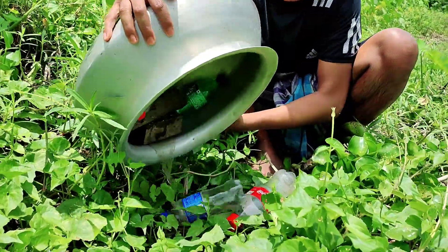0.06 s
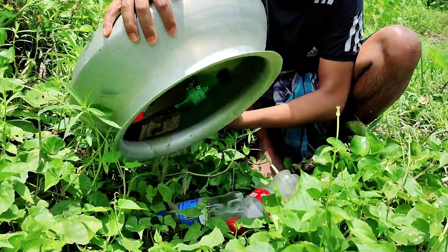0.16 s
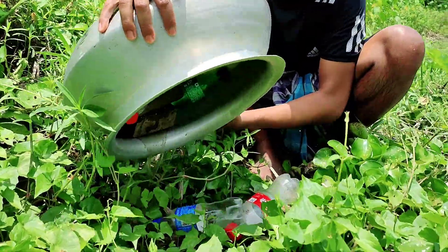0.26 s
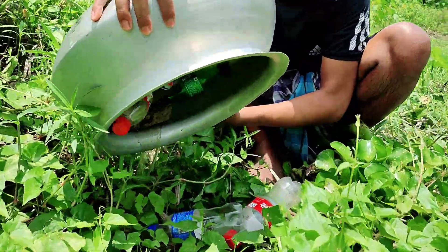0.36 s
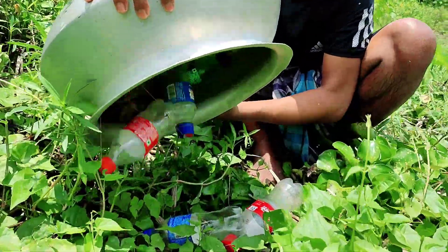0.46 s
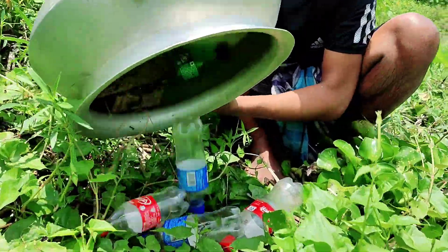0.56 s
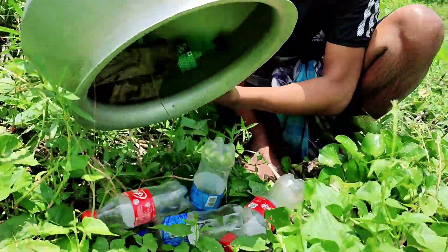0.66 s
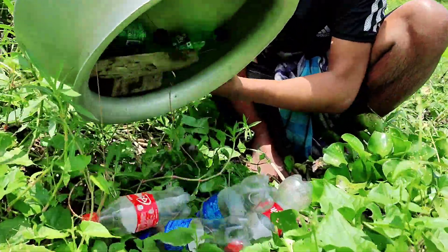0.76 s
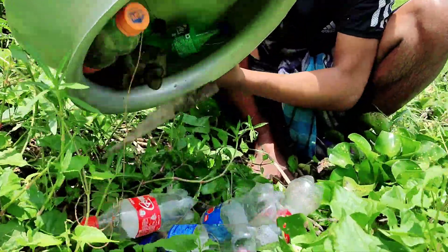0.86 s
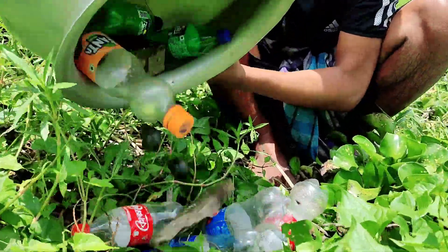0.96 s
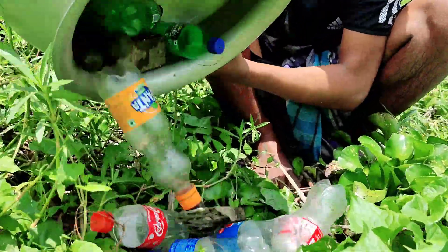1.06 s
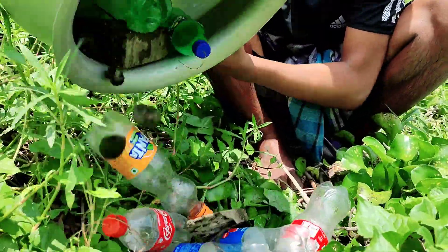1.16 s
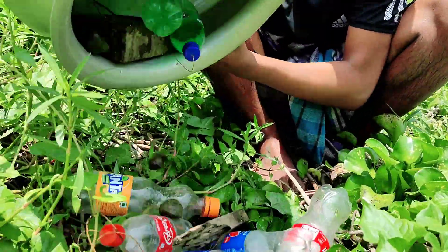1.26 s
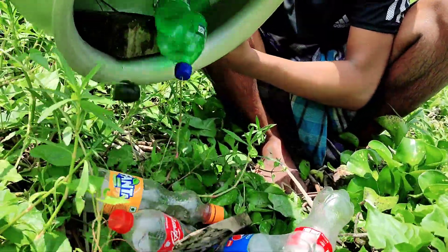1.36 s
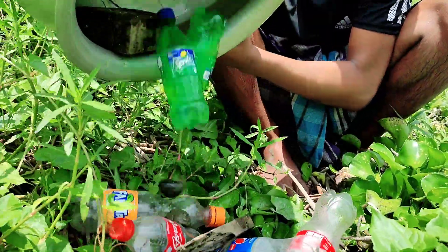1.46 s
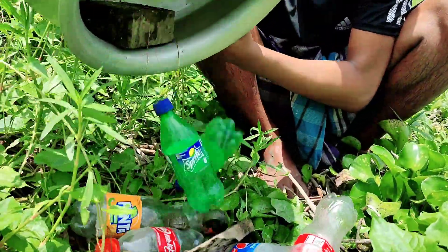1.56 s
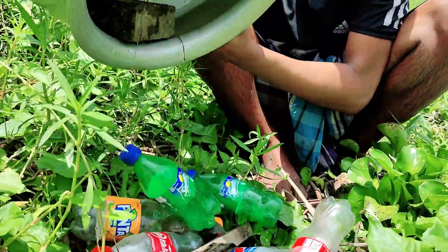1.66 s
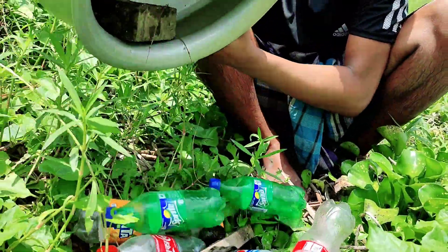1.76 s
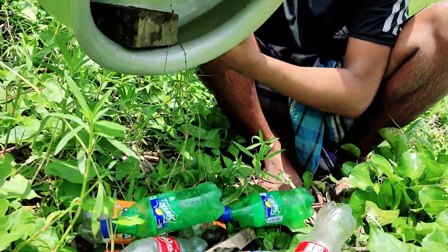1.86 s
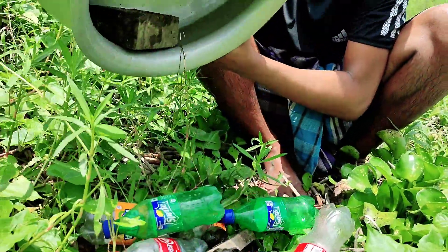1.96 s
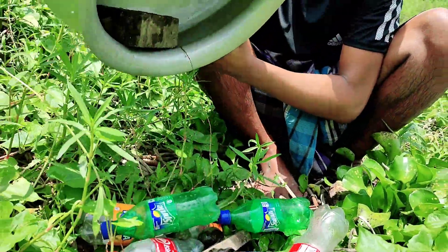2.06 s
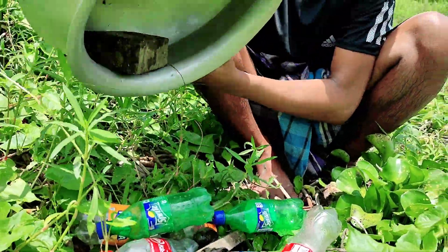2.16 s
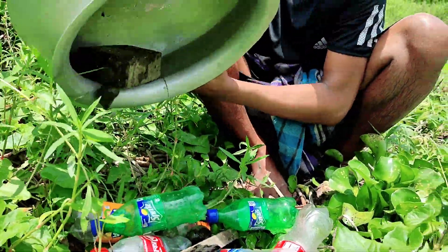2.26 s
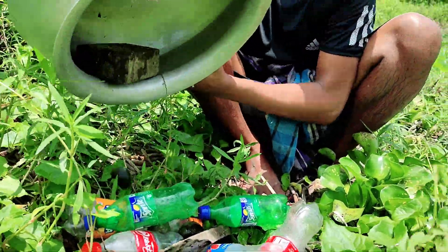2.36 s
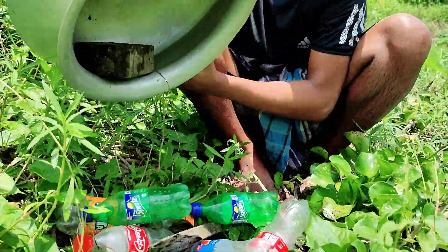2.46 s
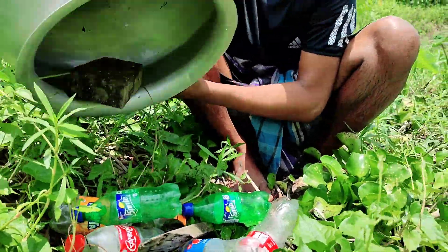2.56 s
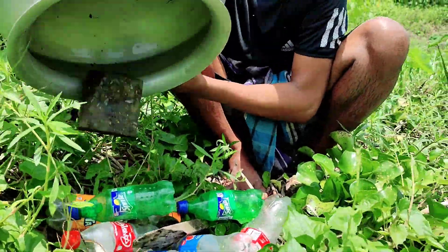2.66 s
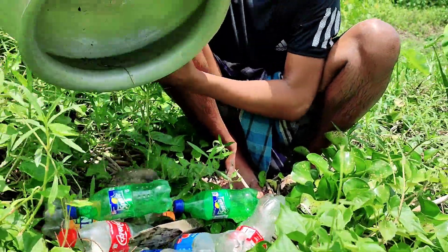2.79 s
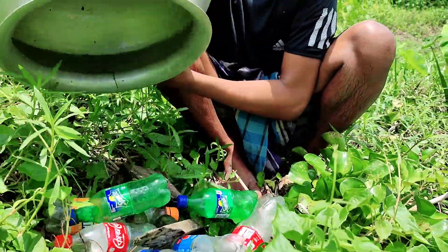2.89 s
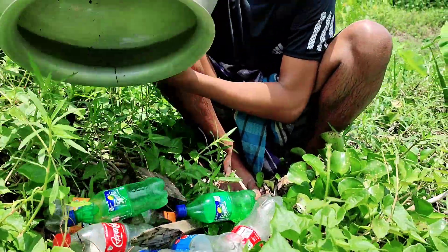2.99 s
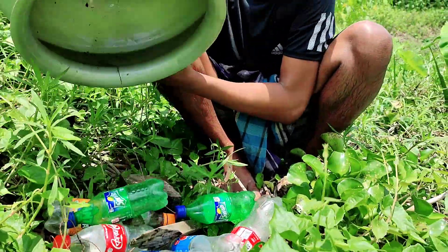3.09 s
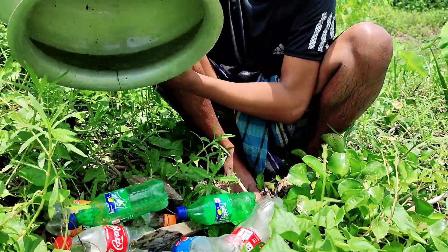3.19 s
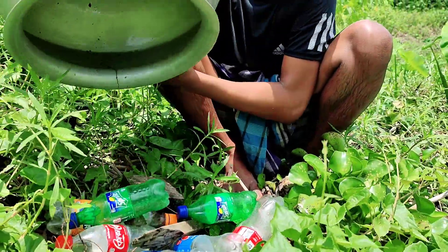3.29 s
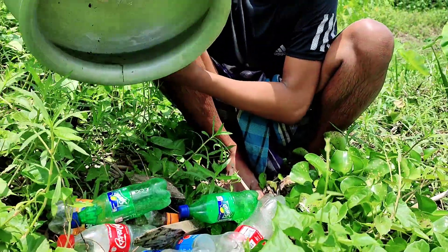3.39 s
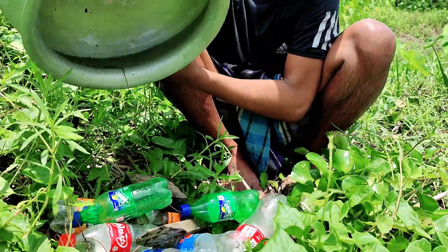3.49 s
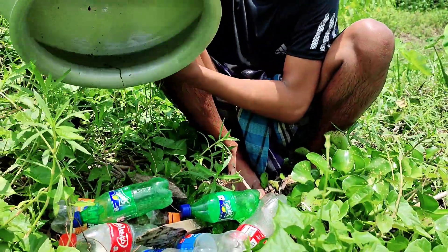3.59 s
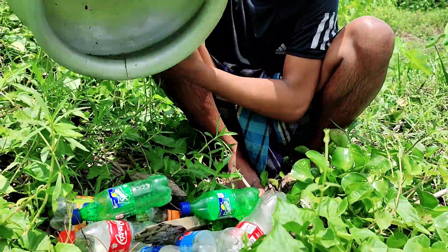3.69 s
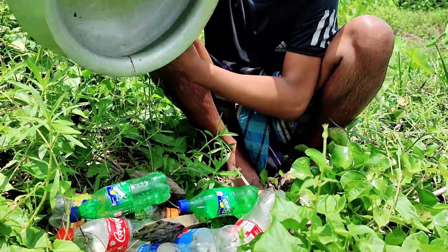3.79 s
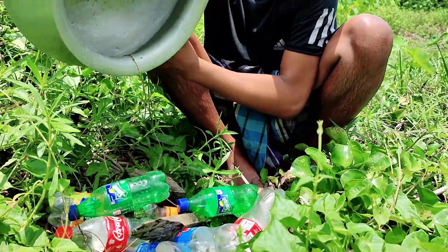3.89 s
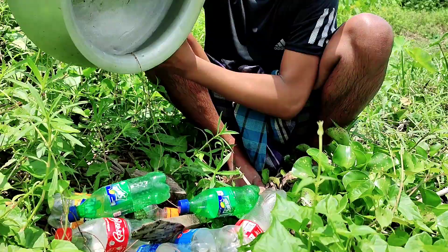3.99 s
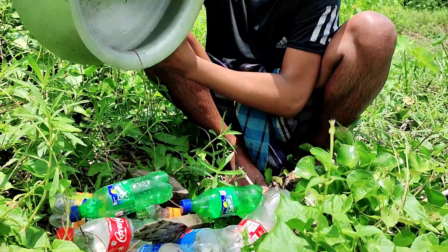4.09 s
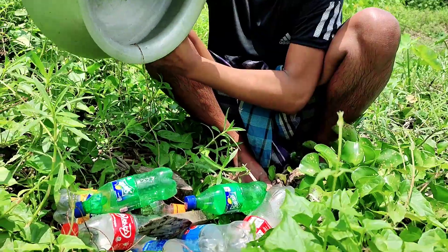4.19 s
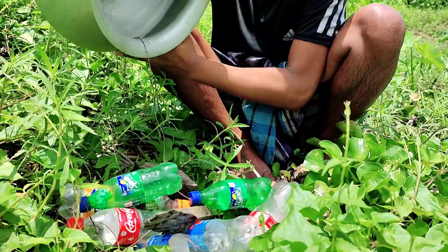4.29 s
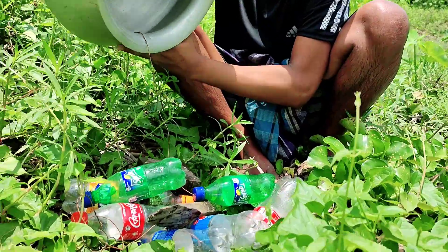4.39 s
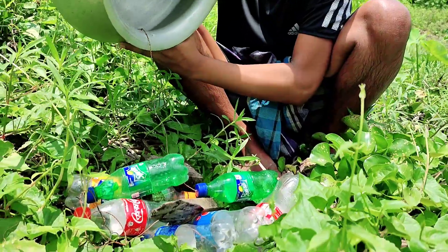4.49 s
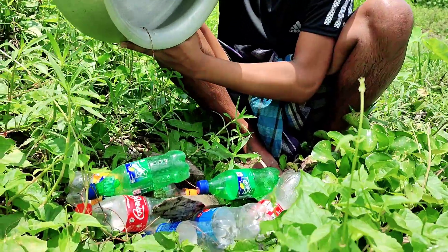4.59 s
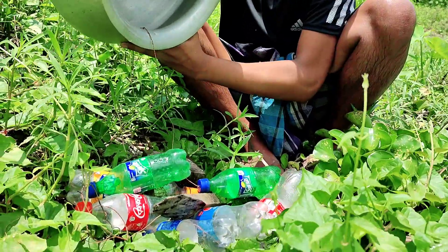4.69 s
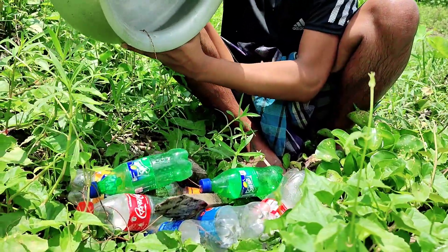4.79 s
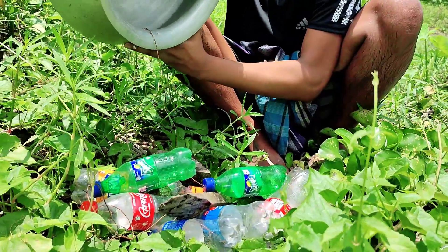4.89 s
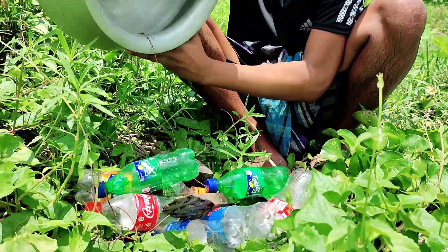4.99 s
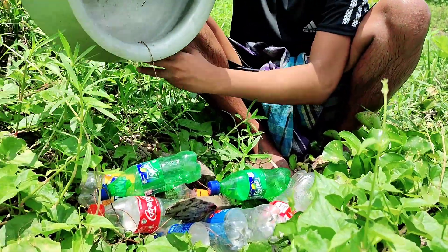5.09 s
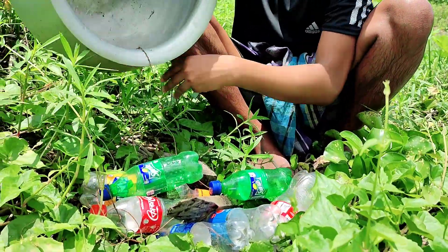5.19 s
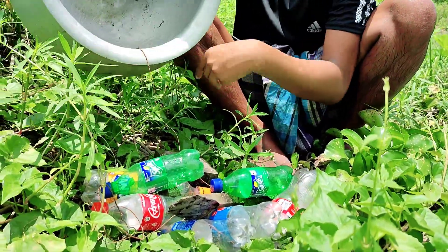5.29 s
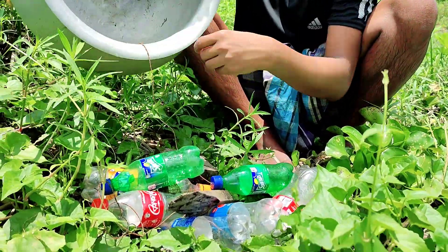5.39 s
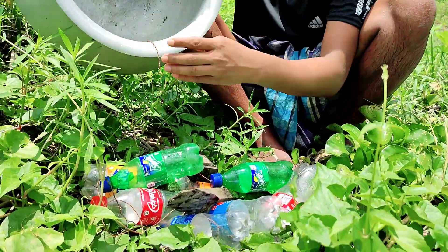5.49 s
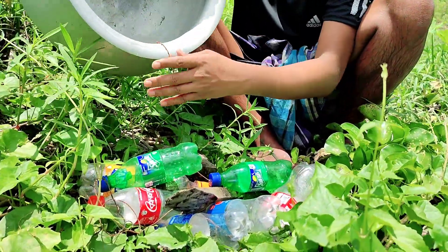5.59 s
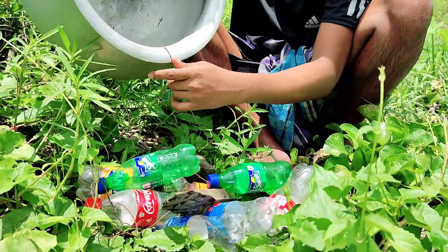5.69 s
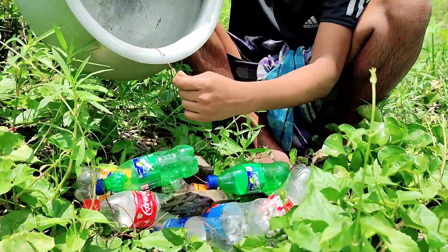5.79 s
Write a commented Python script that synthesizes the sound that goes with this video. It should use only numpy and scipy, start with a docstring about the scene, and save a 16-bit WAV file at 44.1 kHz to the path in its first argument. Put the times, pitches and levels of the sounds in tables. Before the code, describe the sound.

A dense, close clatter of hollow plastic bottles and ringing metal thins to a sliding block, light leaf rustle and low wind thumps.

```python
"""Empty plastic bottles are shaken out of a big aluminium pot onto leafy ground, close to the microphone.
They slide and knock in the ringing pot, drop on each other with hollow pops, and a heavy block follows them.
Then mostly leaves rustle, a light wind bumps the microphone, the rim squeaks and a far bird calls once.
Blows are damped noise and sine pops, the pot is a bank of modes, slides and leaves are showers of grains,
wind is shaped noise, the squeak is narrow noise and the bird is a falling sine."""
import sys
import numpy as np
from scipy import signal
from scipy.fft import rfft, irfft
from scipy.io import wavfile
from scipy.ndimage import uniform_filter1d, map_coordinates

SR = 44100
rng = np.random.default_rng(int(sys.argv[2]) if len(sys.argv) > 2 else 0)


def unload_audio(sound):
    """Save the sound as a 16-bit wav file, at the path given as the first command line argument."""
    columns = np.transpose(np.atleast_2d(sound))
    # keep every value between -1 and 1, then stretch to whole-number steps
    steps = np.round(np.clip(columns, -1, 1) * 32767)
    wavfile.write(sys.argv[1], SR, steps.astype(np.int16))


N = 257984
TIME, HZ = np.arange(N) / SR, np.fft.rfftfreq(N, 1 / SR)

# blows of the bottles and the block: (time [s], strength [dB], hardness [dB], thud level [dB],
# base t60 [s], wall tone [Hz], tone level [dB])
KNOCKS = [(0.004, -44, 3.5, -42, 0.06, 1360, -36), (0.05, -55, 1, -43.5, 0.14, 670, -53),
          (0.108, -52, 0, -49.5, 0.095, 1407, -43), (0.37, -47.5, -1, -43, 0.032, 1720, -62),
          (0.4365, -44.5, -14, -45, 0.069, 1576, -36), (0.49, -38.5, -9, -53, 0.03, 1130, -73),
          (0.636, -59.5, -2.5, -38.5, 0.029, 4000, -53.5), (0.6455, -41, 2, -53.5, 0.022, 1350, -39),
          (0.6547, -28.5, -6, -39.5, 0.021, 1444, -17.5), (0.674, -47.5, -3, -47.5, 0.022, 877, -42),
          (0.7242, -27.5, 6.5, -39, 0.042, 935, -39.5), (0.7735, -28, 4, -47.5, 0.035, 3550, -25.5),
          (0.7765, -29.5, 11.5, -49.5, 0.041, 3470, -23), (0.795, -33, 9.5, -44.5, 0.07, 220, -36.5),
          (0.804, -23, 5.5, -41, .056, 1740, -31), (0.8101, -36, -8.5, -34.5, .08, 1216, -29.5),
          (0.8343, -34.5, 2, -35, .05, 1700, -31.5), (0.873, -28.5, 4, -37, 0.075, 294, -27.5),
          (0.8849, -19.5, -0.5, -34.5, 0.061, 1990, -28.5), (0.89, -21.5, -3, -37, .042, 1230, -28.5),
          (0.91, -31.5, 4.5, -42, 0.075, 1310, -42.5), (0.946, -35.5, 5, -43.5, 0.045, 1200, -51.5),
          (0.9985, -35, 3, -38, 0.019, 1300, -42.5), (1.016, -35.5, -5.5, -36.5, 0.11, 1072, -35.5),
          (1.049, -27, 2, -34.5, 0.025, 1230, -30), (1.077, -40.5, 3, -38.5, 0.022, 1250, -37),
          (1.0834, -47, 24.5, -52, 0.017, 4130, -35.5), (1.095, -32, 8.5, -38.5, 0.09, 1520, -39),
          (1.105, -16.5, 0, -42.5, 0.04, 964, -26.5), (1.111, -29.5, -7, -51, 0.25, 2080, -32.5),
          (1.143, -38, 7, -48.5, .055, 900, -43), (1.1765, -32, -7.5, -43.5, 0.044, 1000, -30),
          (1.198, -38.5, -20, -40, 0.022, 920, -34.5), (1.2572, -34, -7, -45, 0.11, 1184, -47),
          (1.287, -35, 4.5, -35, 0.043, 1420, -37), (1.3163, -29, -0.5, -45, 0.074, 537, -34),
          (1.3606, -33.5, 4, -39, 0.032, 970, -37), (1.523, -33, 2, -43.5, 0.033, 1007, -36),
          (1.5255, -57, 0, -55, 0.1, 952, -40), (1.6048, -22, -4.5, -38.5, 0.05, 1480, -27.5),
          (1.615, -30, -4, -41.5, 0.027, 985, -26.5), (1.646, -55, -6, -37, 0.023, 1330, -45),
          (1.663, -38.5, 4.5, -48, 0.05, 1410, -37.5), (1.6791, -51, 7.5, -39, 0.16, 587, -44),
          (1.793, -46.5, 4, -69, 0.023, 590, -47.5), (1.852, -49.5, 5, -48.5, .04, 1320, -47.5),
          (1.902, -28.5, -11, -63, .032, 1436, -24), (2.0057, -44, -1.5, -47, .029, 600, -49.5),
          (2.318, -61, -2, -74, 0.18, 986, -54), (2.503, -57, -4, -70, 0.021, 935, -49.5),
          (2.518, -57, 1.5, -61, 0.045, 1009, -51.5), (2.847, -39.5, -1, -50, 0.026, 1159, -44.5),
          (2.871, -41.5, -4, -40.5, 0.081, 980, -42), (2.888, -40.5, -5, -40, 0.017, 1104, -37),
          (3.0181, -38.5, -7.5, -64, .028, 2060, -31), (3.019, -53, -13, -61, .034, 1477, -36),
          (3.1382, -48, 3.5, -65, .025, 1760, -65), (3.219, -53.5, 2.5, -65, 0.024, 1400, -56),
          (4.348, -59.5, 2.5, -62, 0.027, 1353, -62)]
# modes of the pot: (frequency [Hz], relative level [dB], t60 before damping [s])
POT_MODES = [(195, -9.5, 0.1), (295.5, 8, 0.14), (645, -5, 0.75), (986, -5, 0.48), (1170, -14, 0.93),
             (1269, -2.5, 0.64), (1526, -11, 1), (1665, 1.5, 0.52), (1710, -4, 0.21), (2160, -10.5, 0.15),
             (2150, 1, 0.15), (2268, -7, 0.12), (2413, 1, 0.13), (2490, -3.5, 0.2), (2620, -5.5, 0.093),
             (2808, -10, 0.11), (3100, -11.5, 0.067), (3500, -15, 0.38), (3500, -8, 0.1),
             (3550, -16.5, 0.24), (4230, -14.5, .2), (4280, -5.5, 0.13), (4440, -14.5, 0.17),
             (4940, -9, .16)]
# how closely things touch the pot, so that it rings; hardly at all while they land on the heap:
# (time [s], level [dB])
POT_CONTACT = [(0, -11.5), (.8, 7), (1.35, -9), (1.5, -21.5), (2.1, -8), (2.18, 4), (2.55, 2), (2.78, 3.5),
               (2.84, -6.5)]
# colour of leaves and grit: (frequency [Hz], relative level [dB])
LEAF_COLOUR = [(300, -13.5), (1200, -0.5), (2200, -0.5), (3500, 1.5), (5500, 0), (7200, 3), (11500, -2.5),
               (14500, -5.5)]
POT_DAMPING = 1.4  # the load and the hands divide every t60 of the pot by this


def gain_of(db):
    """Decibels to gain."""
    return 10 ** (np.asarray(db) / 20)


def evened(x):
    """Scales to rms 1."""
    return x / np.sqrt(np.mean(x ** 2) + 1e-20)


def read(points, hz):
    """Reads a spectrum table on a log-frequency axis."""
    f, value = np.transpose(points)
    return np.interp(np.log(hz + 1), np.log(f + 1), value)


def level(rows):
    """A dB curve over time as a gain for each sample."""
    return gain_of(np.interp(TIME, *np.transpose(rows)))


def add(mix, s, sound):
    """Mixes a sound in at time s."""
    part = mix[..., max(0, round(s * SR)):][..., :sound.shape[-1]]
    part += sound[..., :part.shape[-1]]


def shaped(x, spectrum):
    """Filters a signal by a spectrum table, then sets it to rms 1."""
    return evened(irfft(rfft(x) * gain_of(read(spectrum, HZ)), N))


def grains(per_s, spread_db, grain_s):
    """Two channels of tiny noise bursts at shared random moments, of uneven size."""
    sizes = gain_of(max(spread_db, 0) * np.minimum(rng.exponential(1, N), 4))
    sizes = sizes * (rng.random(N) < per_s / SR)
    power = signal.lfilter([1], [1, -np.exp(-1 / (grain_s * SR))], sizes ** 2)
    return evened(np.sqrt(power) * rng.standard_normal((2, N)))


def swell(start, length, rise_s, t60):
    """Attack, hold and release of one movement, as a gain for each sample."""
    rise = np.sin(np.pi / 2 * np.clip((TIME - start) / rise_s, 0, 1)) ** 2
    return rise * gain_of(-60 * np.clip((TIME - start - length) / t60, 0, 2))


def together(swells, db):
    """Overlapping movements, each at its own level, add in power."""
    return np.sqrt(gain_of(db) ** 2 @ np.square(swells))


def blow(x, t, t60, rise_s):
    """A swell and a decay on x; the first hundredth of a second has rms 1."""
    x = x * (1 - np.exp(-(t / rise_s) ** 2)) * gain_of(-60 * t / t60)
    return x / np.sqrt(np.mean(x[..., :SR // 100] ** 2, axis=-1, keepdims=True) + 1e-20)


def loaded(pair, drift=0.012, drift_s=0.04):
    """The moving load bends the pitch of the pot's modes at random, by an rms share, through a varying lag."""
    width = max(2, round(drift_s * SR))
    bend = evened(uniform_filter1d(uniform_filter1d(rng.standard_normal(N), width), width))
    lag = bend * drift / np.std(np.diff(bend) * SR)
    return np.array([map_coordinates(x, [(TIME + lag) * SR], order=3) for x in pair])


def outdoors(wind_db=-1, right_db=-14, shared=0.9, far_apart_db=-6, far_db=-56.5, air_db=-68):
    """Gusts as swelling noise, stronger at the left port, over the low rumble and still hiss of the field."""
    # colour of the wind: (frequency [Hz], relative level [dB])
    gust_colour = [(8.8, -32), (15, 8.5), (43, -4.5), (85, -6), (184, -23), (226, -26.5), (251, -35.5),
                   (357, -36.5), (500, -50.5), (650, -71.5), (1100, -120)]
    # gusts on the microphone: (start [s], length [s], relative level [dB])
    gust_times = [(0.0, .05, -50), (0.67, 0.77, -55), (2.257, .3, -48), (3.544, 0.24, -49.5),
                  (3.807, 0.17, -43), (4.103, 0.55, -45.5), (4.708, 0.47, -46.5), (5.258, 0.18, -50),
                  (5.664, 0.17, -44.5)]
    # colour of the far rumble: (frequency [Hz], relative level [dB])
    far_colour = [(10, 2), (25, -3), (80, -0.5), (130, -7), (250, -22.5), (500, -45.5)]
    # colour of the still air: (frequency [Hz], relative level [dB])
    air_colour = [(120, -40), (200, -9.5), (258, -21), (405, -17), (494, -26.5), (540, -25), (3290, -27.5),
                  (3470, -35), (4720, -31), (15000, -43)]
    a, b = shaped(rng.standard_normal((2, N)), gust_colour)
    swells = [swell(s, length, rise_s=0.057, t60=0.58) for s, length, _ in gust_times]
    gusts = together(swells, [db for *_, db in gust_times])
    wind = np.array([a, gain_of(right_db) * evened(b + shared * a)])
    wind = wind * gusts * gain_of(wind_db) * np.sqrt(2)
    common = rng.standard_normal(N)
    far = shaped(common + gain_of(far_apart_db) * rng.standard_normal((2, N)), far_colour)
    air = shaped(rng.standard_normal((2, N)), air_colour)
    return wind + gain_of(far_db) * far + gain_of(air_db) * air


def sliding(rumble_db=-1, scrape_db=-3.5, sing_db=-3, hiss_db=0.0):
    """Stick and slip of bottles and block: rumble, dry scrape, gritty hiss, and metal that sings and rings on."""
    # bottles, then the block, sliding in the pot and on the heap:
    # (start [s], length [s], relative scrape [dB], relative rumble [dB], relative hiss [dB])
    slides = [(0.0, 0.079, -43, -44.5, -53.5), (0.129, 0.2, -53, -56.5, -54.5),
              (0.342, 0.16, -47, -51, -50.5), (0.58, 0.045, -54, -65.5, -61),
              (0.747, 0.16, -45, -47.5, -49.5), (0.942, 0.27, -39, -49.5, -46),
              (1.251, 0.14, -47.5, -49.5, -51), (1.415, 0.095, -56, -61, -56),
              (1.582, 0.13, -41, -51, -48.5), (1.894, 0.041, -50, -60.5, -47),
              (2.162, 0.072, -49.5, -49.5, -45), (2.257, 0.036, -54, -49.5, -54),
              (2.425, 0.16, -59.5, -59, -58.5), (2.545, 0.052, -43, -43.5, -49.5),
              (2.611, 0.088, -50, -47, -51.5), (2.839, 0.049, -49, -53, -44.5)]
    # colour of the rumble: (frequency [Hz], relative level [dB])
    rumble_colour = [(80, -12), (130, -1), (200, 7), (300, 2.5), (420, -6.5), (600, -7.5), (1000, -39)]
    # colour of the scrape: (frequency [Hz], relative level [dB])
    scrape_colour = [(300, -22), (600, -11.5), (1100, 7.5), (1800, 4), (2500, -9.5), (3100, -15),
                     (4000, -12), (7000, -18.5)]
    t = np.arange(SR // 2) / SR
    pot = sum(gain_of(db - 60 * POT_DAMPING * t / t60) * np.sin(2 * np.pi * hz * t)
              for hz, db, t60 in POT_MODES)
    slips = grains(per_s=500, spread_db=4.0, grain_s=0.00077)
    # a slide gathers speed, holds it, and runs out
    moves = [swell(s, length, rise_s=0.044, t60=0.27) for s, length, *_ in slides]
    force, weight, grit = (together(moves, db) for db in np.transpose(slides)[2:])
    touching = slips * force * level(POT_CONTACT)
    sing = signal.fftconvolve(touching, pot[None] / np.linalg.norm(pot), axes=1)[:, :N]
    scrape = force * shaped(slips, scrape_colour)
    rumble = weight * shaped(slips, rumble_colour)
    hiss = grit * shaped(grains(per_s=1400, spread_db=1.5, grain_s=0.0025), LEAF_COLOUR)
    dry_slide = gain_of(scrape_db) * scrape + gain_of(rumble_db) * rumble + gain_of(hiss_db) * hiss
    return gain_of(sing_db) * loaded(sing) + dry_slide


def bottle_modes(count, depth_db=6, spacing_hz=120):
    """Noise in the wall's colour with random peaks: every bottle and every spot on it has its own modes."""
    # colour of a thin bottle wall: (frequency [Hz], relative level [dB])
    shell_colour = [(150, -5), (290, -1), (400, 0), (520, -3.5), (700, 1.5), (1000, 0), (1300, 11.5),
                    (2000, 5), (2700, 3), (3400, 8.5), (4300, 1.5), (5200, -6.5), (7000, -1.5),
                    (14000, -7.5)]
    hz = np.fft.rfftfreq(count, 1 / SR)
    heights = np.clip(rng.standard_normal(600), -2, 1.6)
    db = read(shell_colour, hz) + depth_db * np.interp(hz / spacing_hz, np.arange(len(heights)), heights)
    return irfft(rfft(rng.standard_normal((2, 2, count))) * gain_of(db), count)


def clatter(tail_db=-22, tail_t60=0.21, rise_s=0.0012):
    """Each blow sets off the dense, quickly damped modes of a thin bottle, with a faint, slower scatter."""
    # bands of a blow, in order thud, clack, crack, crinkle: (low edge [Hz], high edge [Hz], factor on the t60)
    bands = [(150, 494, 1.1), (702, 3530, 1.4), (2677, 5950, 1.786), (6760, 14000, 1.3)]
    crack_db, crinkle_db, crinkle_per_hardness = -4.5, -11.5, 0.93  # relative to the clack
    out, t = np.zeros((2, N)), np.arange(8192) / SR
    filters = [signal.butter(3, [lo, min(hi, SR / 2 - 100)], "band", fs=SR, output="sos")
               for lo, hi, _ in bands]
    for s, strength, hardness, thud, t60, *_ in KNOCKS:
        modes = bottle_modes(count=len(t))
        # a harder contact raises both treble bands
        crack = strength + crack_db + hardness
        crinkle = strength + crinkle_db + crinkle_per_hardness * hardness
        for sos, (_, _, longer), db in zip(filters, bands, (thud, strength, crack, crinkle)):
            shell, scatter = signal.sosfilt(sos, modes)
            body = blow(shell, t, t60 * longer, rise_s)
            tail = gain_of(tail_db) * blow(scatter, t, tail_t60, 0.0078)
            add(out, s, gain_of(db) * (body + tail))
    return out


def pops(second_db=-8, second_ratio=0.73, echo_s=0.0078, echo_db=-9, echo_ratio=1.2):
    """The struck wall pops at one pitch, with a weaker mode below it and a quick, higher bounce."""
    out, t = np.zeros(N), np.arange(SR // 6) / SR
    for s, *_, t60, hz, db in KNOCKS:
        wall = np.sin(2 * np.pi * hz * t)
        wall = wall + gain_of(second_db) * np.sin(2 * np.pi * hz * second_ratio * t)
        bounce = gain_of(echo_db) * (t > echo_s) * np.sin(2 * np.pi * hz * echo_ratio * (t - echo_s))
        add(out, s, gain_of(db) * blow(wall + bounce, t, t60, 0.00058))
    return out


def pot_ring(ring_db=-16, growth=0.75, uneven_db=4.5, per_octave_db=3, near_db=7, near_octaves=0.21):
    """Blows on the pot ring its modes, favouring those near the blow's pitch; load and hands damp them."""
    out, t = np.zeros((2, N)), np.arange(SR // 2) / SR
    hz, db, t60 = np.transpose(POT_MODES)
    decay = gain_of(-60 * POT_DAMPING * t / t60[:, None])
    modes = np.exp(2j * np.pi * hz[:, None] * t) * decay * (1 - np.exp(-t / 0.002))
    for s, strength, *_, tone_hz, _ in KNOCKS:
        struck_db = growth * strength + np.interp(s, *np.transpose(POT_CONTACT))
        apart = abs(np.log2(hz / tone_hz))  # octaves
        favour_db = near_db * np.exp(-(apart / near_octaves) ** 2) - per_octave_db * apart
        share = gain_of(db + uneven_db * rng.standard_normal(len(hz)) + favour_db)
        share = share / np.linalg.norm(share) * np.exp(2j * np.pi * rng.random(len(hz)))
        # each mode is a quarter turn apart in the two channels, which leaves them unrelated
        pair = np.array([share, share * rng.choice([-1j, 1j], len(hz))])
        add(out, s, gain_of(struck_db + ring_db) * np.sqrt(2) * (pair @ modes).real)
    return loaded(out)


def leaves(rustle_db=0.0, crackle_db=-9, snap_db=-10):
    """A fine rustle of many leaves, a sparser crackle of stems, and single sharp snaps of decaying noise."""
    # snaps of stems, leaves and thin plastic: (time [s], relative level [dB], t60 [s])
    snap_times = [(0.2507, -30, 0.03), (0.264, -26, 0.027), (0.2973, -24.5, 0.033), (0.315, -29, 0.065),
                  (0.3344, -29.5, 0.03), (0.359, -19, 0.016), (0.375, -19.5, 0.024), (0.387, -30.5, 0.02),
                  (0.4898, -52, 0.03), (0.579, -25.5, 0.025), (0.634, -24, 0.059), (0.7245, -17, 0.023),
                  (0.758, -21.5, 0.096), (1.028, -22.5, 0.03), (1.288, -15, 0.035), (1.316, -20, 0.02),
                  (1.337, -21, 0.02), (1.6618, -29.5, 0.052), (1.732, -38, 0.029), (1.77, -35, 0.14),
                  (1.979, -25, 0.036), (1.9845, -24.5, 0.054), (2.3586, -36, 0.083), (2.366, -26.5, 0.016),
                  (2.5726, -52, 0.026), (3.139, -43, 0.016), (3.223, -59, 0.015), (3.673, -34, 0.026),
                  (4.3284, -38, 0.018), (5.0728, -37, 0.021), (5.6418, -47.5, 0.016)]
    # sweeps of bottles, pot and arms through the leaves: (start [s], length [s], relative level [dB])
    brushes = [(0.06, 0.054, -48.5), (0.196, .14, -59.5), (0.44, 0.26, -53.5), (1.09, .06, -45),
               (1.74, 0.23, -52), (1.896, 0.02, -46), (2.663, 0.45, -59), (2.855, 0.067, -49),
               (3.063, .04, -78), (3.193, 0.049, -56.5), (3.317, 0.24, -62), (3.486, 0.023, -56.5),
               (3.724, 0.18, -59.5), (4.13, 0.093, -67.5), (4.196, 0.57, -62), (4.913, 0.056, -54),
               (5.025, 0.093, -60.5), (5.138, 0.19, -60.5), (5.65, .14, -71.5), (5.792, 0.15, -39.5)]
    snaps, t = np.zeros((2, N)), np.arange(SR // 8) / SR
    fizz_colour = [(400, -12.5), (1500, -3.5), (4000, -4), (7000, 5.0), (14000, 1)]  # ([Hz], [dB])
    fizz = shaped(rng.standard_normal((2, N)), fizz_colour)
    start = 1 - np.exp(-t / 0.0003)
    for s, db, t60 in snap_times:
        add(snaps, s, gain_of(db + snap_db - 60 * t / t60) * start)
    fine = grains(per_s=4500, spread_db=0.5, grain_s=0.003)
    rustle = gain_of(rustle_db) * shaped(fine, LEAF_COLOUR)
    sparse = grains(per_s=32, spread_db=1.0, grain_s=0.0005)
    crackle = gain_of(crackle_db) * shaped(sparse, LEAF_COLOUR)
    # a sweep swells over a share of its length, then the leaves settle
    sweeps = [swell(s, length, rise_s=0.53 * length, t60=0.45) for s, length, _ in brushes]
    return snaps * fizz + together(sweeps, [db for *_, db in brushes]) * (rustle + crackle)


def bumps():
    """Soft bumps as low, quickly damped sine swings, many of them mainly at the left port."""
    # bumps of the pot and of wind on the microphone:
    # (time [s], level before the decay [dB], frequency [Hz], t60 [s], right port relative to left [dB])
    bump_times = [(0.432, -23, 230, 0.032, 0), (0.574, -22.5, 59, 0.044, -17), (2.37, -20, 36.2, 0.1, -25),
                  (2.453, -38, 121, 0.13, -7), (2.528, -27, 99, 0.042, -1), (2.571, -17, 127, 0.029, 0),
                  (2.593, -33, 196, 0.18, 0.5), (3.549, -33, 53.5, 0.25, -14),
                  (4.888, -20, 35.3, 0.065, -18), (4.968, -13.5, 52.5, 0.081, -34),
                  (4.974, -20.5, 165, 0.015, -30), (5.089, -26, 44, 0.16, -27),
                  (5.756, -20.5, 42.5, 0.084, -17.5)]
    out, t = np.zeros((2, N)), np.arange(SR // 3) / SR
    for s, db, hz, t60, right_db in bump_times:
        swing = gain_of(db - 60 * t / t60) * (1 - np.exp(-t * hz * 2)) * np.sin(2 * np.pi * hz * t)
        add(out, s, gain_of([[0], [right_db]]) * swing)
    return out


def squeak(hz=1110, width_hz=70):
    """A hand rubs the pot's rim: skin slipping on it, as noise, excites one narrow resonance."""
    # loudness of the squeak: (time [s], level [dB])
    squeak_level = [(4.92, -84), (4.95, -58), (4.98, -56), (5.01, -66), (5.06, -75), (5.115, -66),
                    (5.15, -96)]
    rub = rfft(rng.standard_normal(N)) / (1 + ((HZ - hz) / width_hz) ** 2)
    sounding = (TIME > squeak_level[0][0]) * (TIME < squeak_level[-1][0])
    return evened(irfft(rub, N)) * level(squeak_level) * sounding


def bird():
    """One distant, nearly pure, falling whistle: a sine with gliding pitch and level."""
    # the falling note: (time [s], frequency [Hz], level [dB])
    note = [(5.43, 3260, -84.5), (5.47, 3240, -69), (5.487, 2870, -73), (5.5, 2520, -76),
            (5.519, 2400, -89.5)]
    s, hz, db = np.transpose(note)
    sounding = (TIME > s[0]) * (TIME < s[-1])
    phase = 2 * np.pi * np.cumsum(np.interp(TIME, s, hz)) / SR
    return gain_of(np.interp(TIME, s, db)) * sounding * np.sin(phase)


def ports(pair):
    """Two unrelated channels become alike by frequency, fully so in the bass, as at two close ports."""
    # likeness of the two ports, clipped to 0-1: (frequency [Hz], likeness)
    likeness = [(100, 1.5), (580, 1), (950, 0), (1500, 0.9), (2200, -0.06), (4000, 0.35), (4500, 0)]
    a, b = rfft(pair)
    same = np.clip(read(likeness, HZ), 0, 1)
    return irfft(np.array([a, same * a + np.sqrt(1 - same ** 2) * b]), N)


def scene():
    """Sets the phase and level between the ports for all but bumps and outdoors, then sums everything."""
    # phase by which the left port leads: (frequency [Hz], lead [rad])
    lead = [(20, -1), (280, 0.42), (600, 0.3), (1000, 1.07), (1400, 2.5), (2200, 4), (4000, 6)]
    # left minus right level: (frequency [Hz], difference [dB])
    balance = [(100, 1.5), (1000, -0.5), (2500, 1.5), (5000, -4), (10000, -6)]
    spread = ports(clatter() + pot_ring() + sliding() + leaves())
    left, right = rfft(spread + pops() + squeak() + bird())
    side = gain_of(read(balance, HZ) / 2)  # half of the difference on each port
    near = irfft(np.array([left * side, right / side * np.exp(-1j * read(lead, HZ))]), N)
    ends = signal.windows.tukey(N, 0.002)  # very short fades
    return near * ends + bumps() + outdoors()


def record(dry):
    """The treble colour of the microphone, then a steep low-pass as the band limit."""
    # treble colour of the ports: (frequency [Hz], level [dB])
    treble = [(5000, 1), (5600, 0), (7300, 3), (7900, -3), (8300, -5), (9300, -3), (11000, 3), (13500, 1.5)]
    edge_hz = 14330
    coloured = irfft(rfft(dry) * gain_of(read(treble, HZ)), N)
    lowpass = signal.firwin(401, edge_hz, window=("kaiser", 9), fs=SR)
    return signal.oaconvolve(coloured, lowpass[None], "same")


dry = scene()
out = record(dry)
unload_audio(out)
```